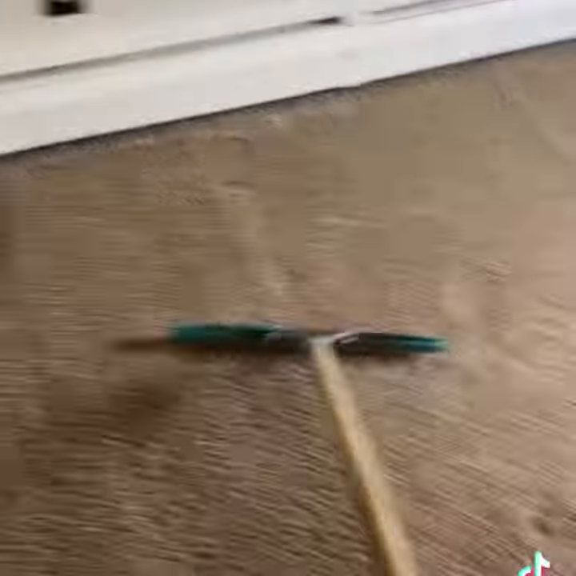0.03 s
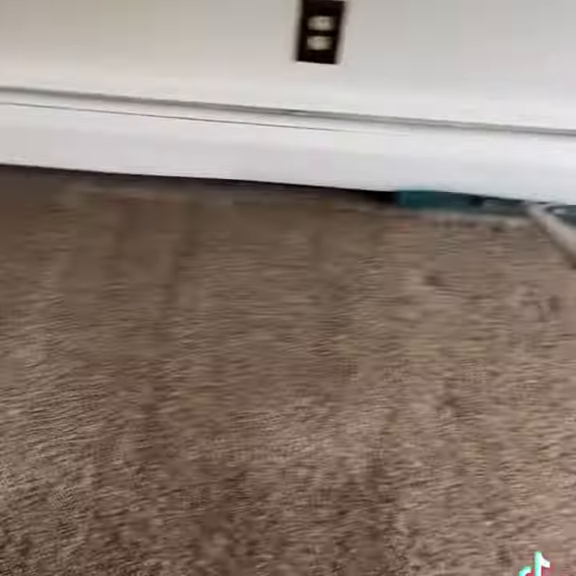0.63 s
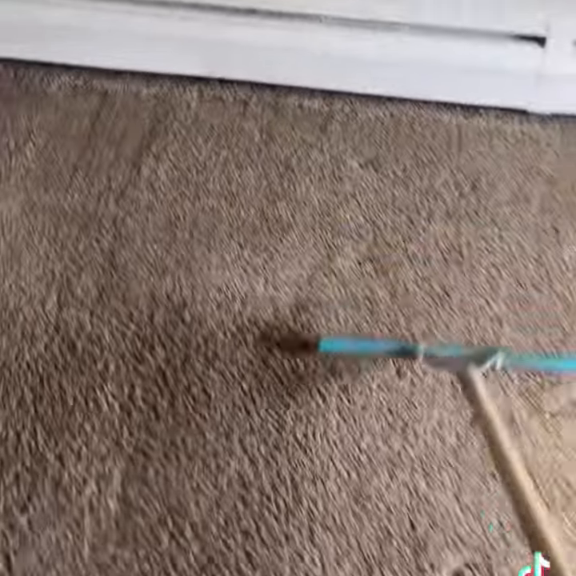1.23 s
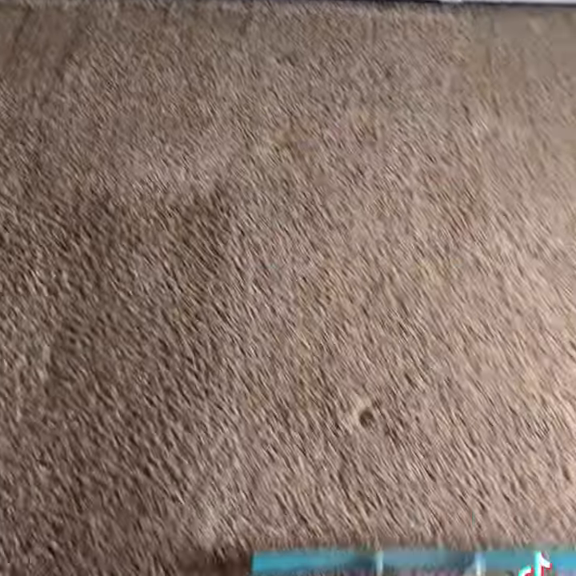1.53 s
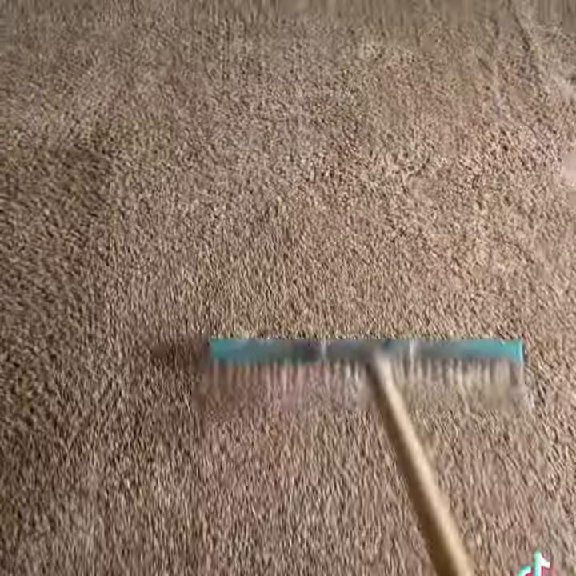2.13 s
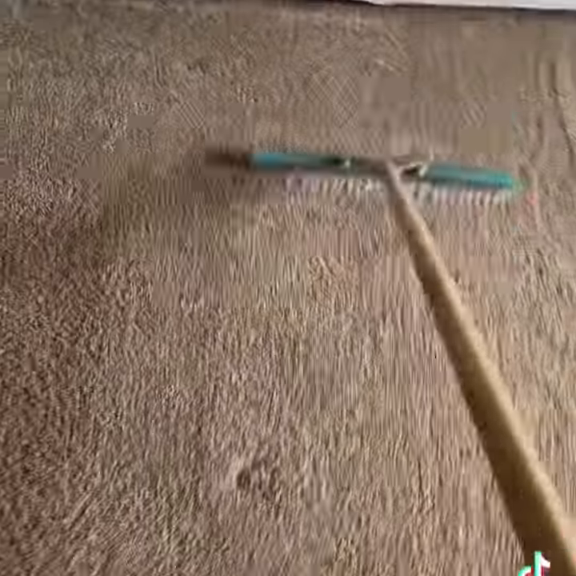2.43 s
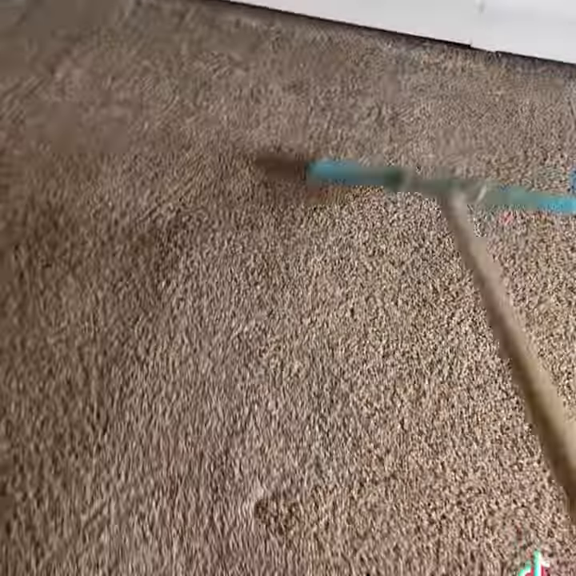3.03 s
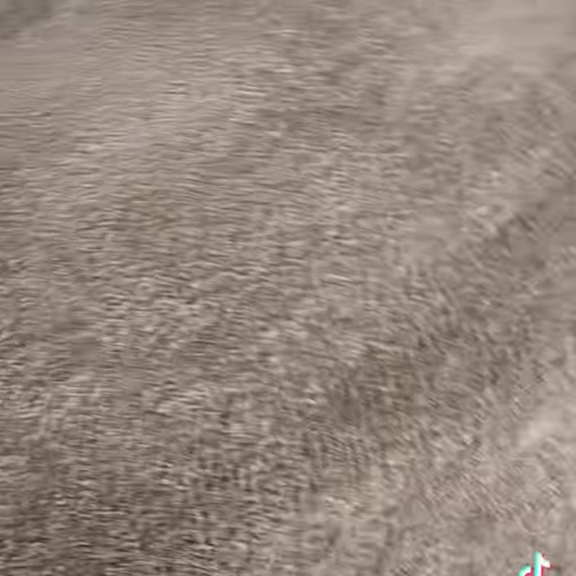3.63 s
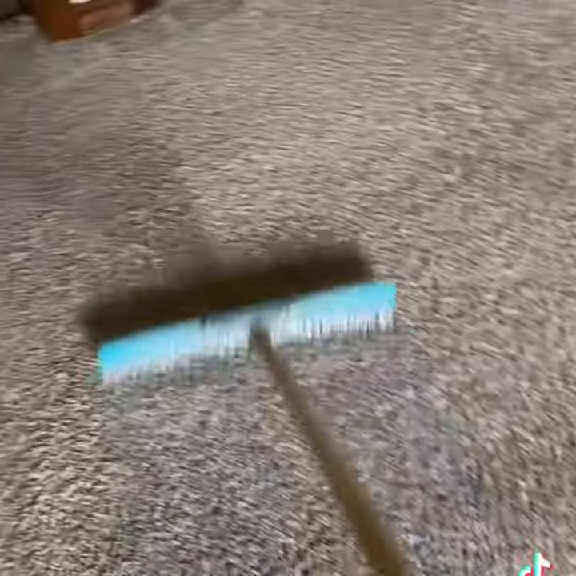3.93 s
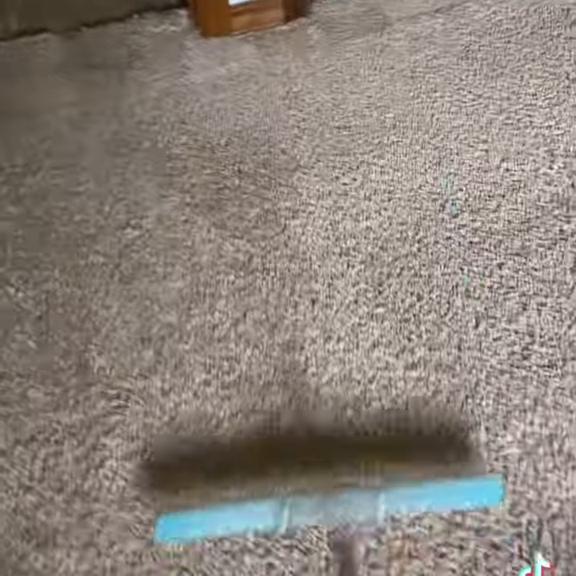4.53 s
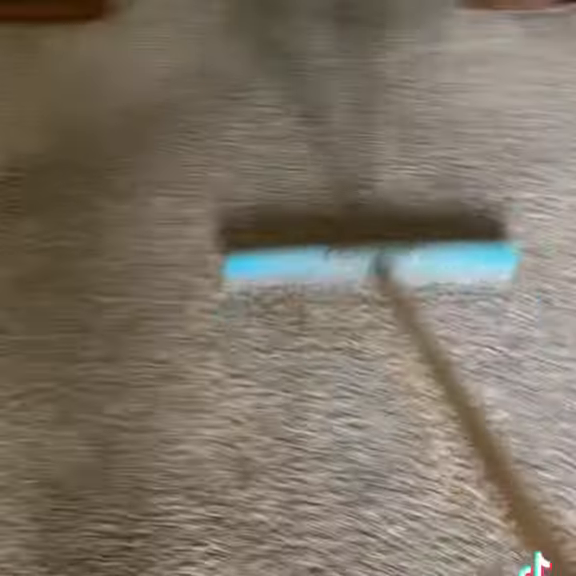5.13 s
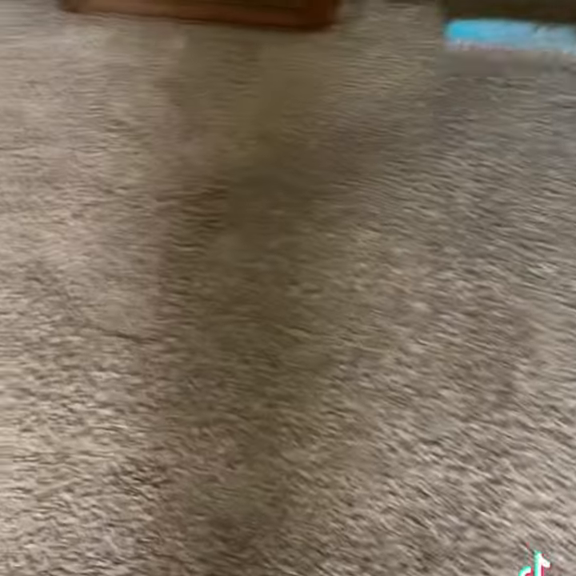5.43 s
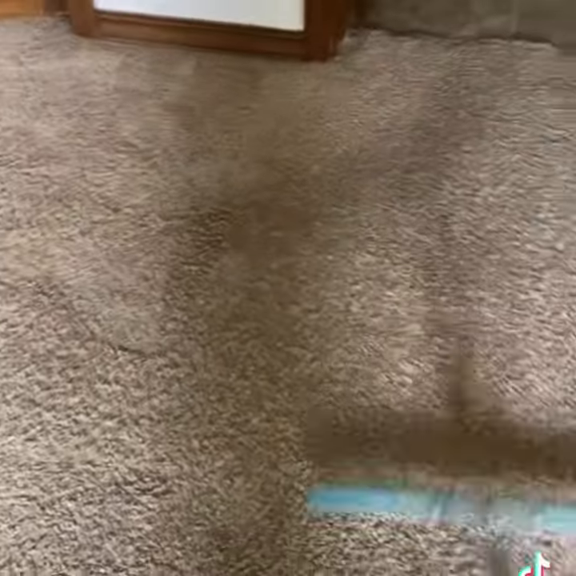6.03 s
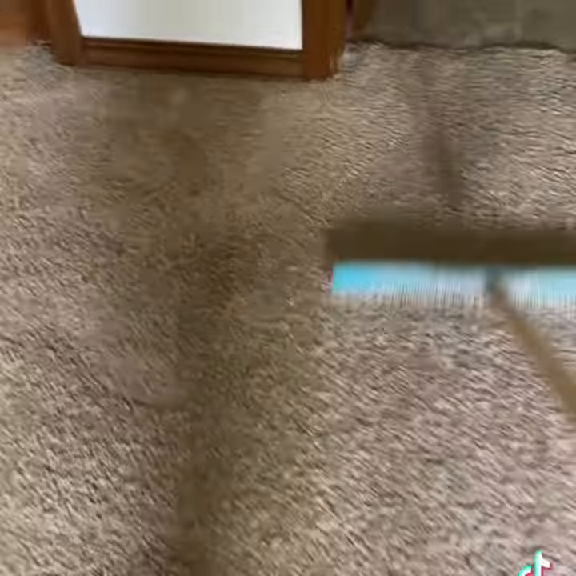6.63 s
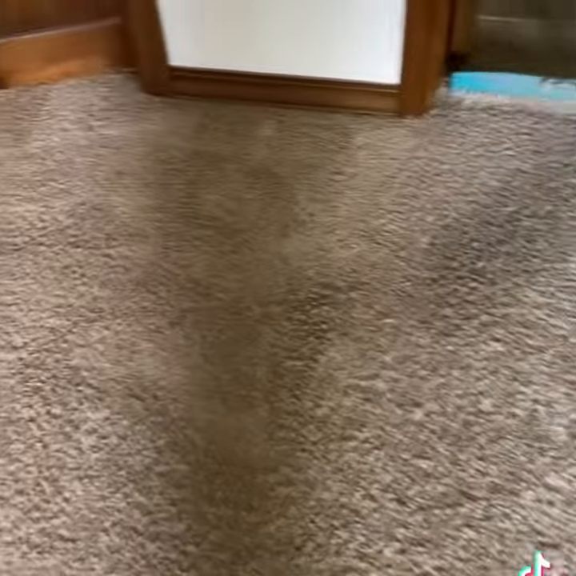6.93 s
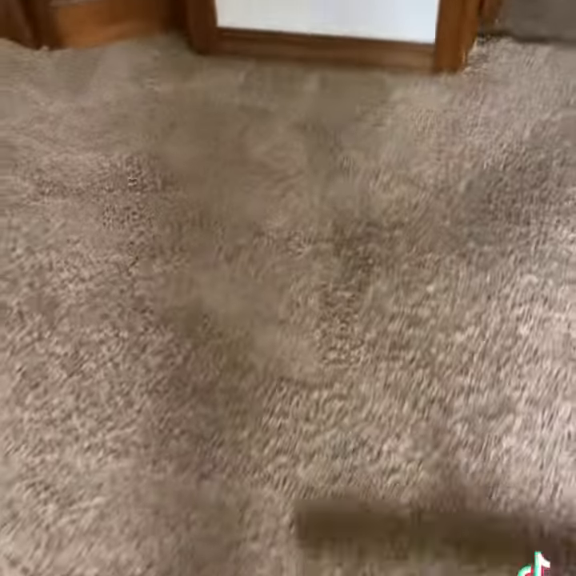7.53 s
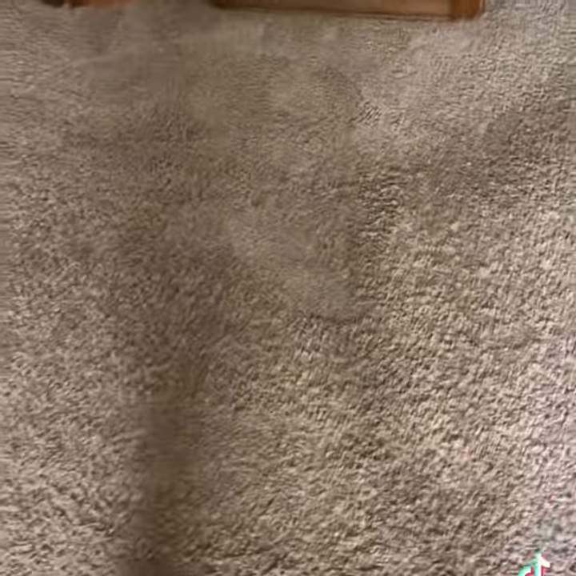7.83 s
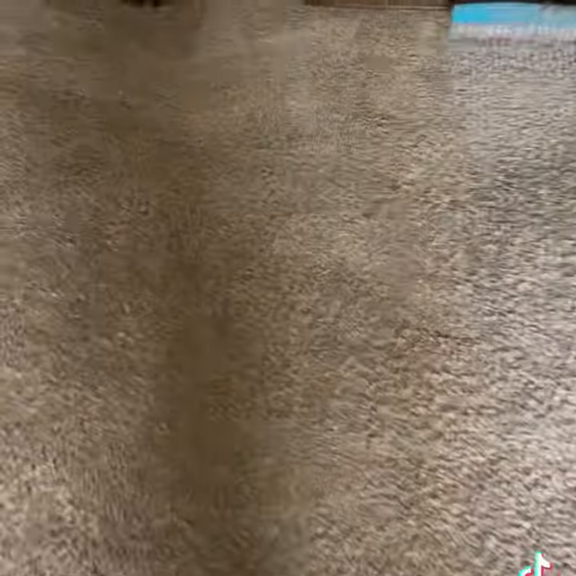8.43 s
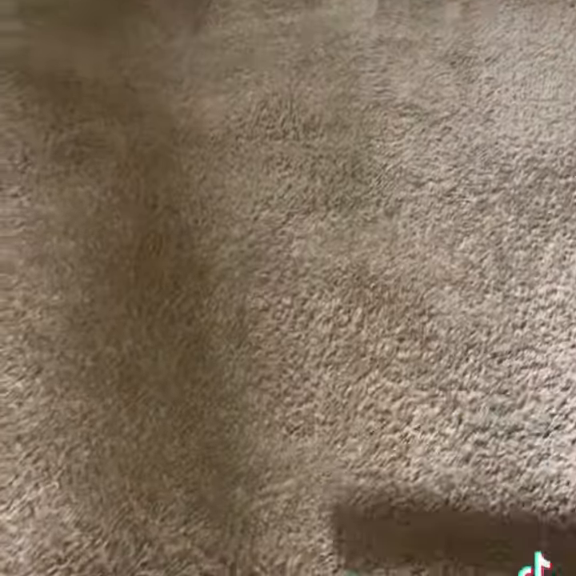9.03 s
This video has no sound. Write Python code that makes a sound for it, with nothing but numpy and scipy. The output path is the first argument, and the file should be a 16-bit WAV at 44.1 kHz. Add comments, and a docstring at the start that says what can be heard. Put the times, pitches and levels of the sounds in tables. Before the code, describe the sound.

A bristled rake works back and forth over carpet, close by, in a room with little echo. It opens with a light scrubbing push, and at 0.6 seconds the head strikes a metal heater cover with a crack and a short, dull boom. A soft hissing pull follows from 1 to 2 seconds, over a few muffled footfalls. Louder pushes start at about 1.9, 3.7, 4.9, 6.4, 7.8 and 9.1 seconds, each a coarse, rasping scrub lasting under a second. Between them come lighter pulls, a high hiss that flutters as the bristles skip. The loose plastic head clicks as strokes turn, with the sharpest clacks near 2.2, 3.7, 4.3, 4.9, 8 and 9.1 seconds. Single soft steps fall around 3.4 and 7.9 seconds. A faint, low appliance hum continues underneath throughout.

```python
"""In a carpeted room, a rake with a wooden handle is pushed and pulled over the pile close by.
Bristles stick and slip: pushes dig in and scrub, pulls hiss and skip. As the stroke turns, the loose
plastic head clacks on the handle, and once it strikes a baseboard heater, whose metal cover booms.
Soft footfalls and the hum of an appliance lie underneath."""
import sys
import numpy as np
from scipy import signal
from scipy.fft import rfft, irfft, next_fast_len
from scipy.io import wavfile
from scipy.ndimage import uniform_filter1d, map_coordinates

SR = 44100
rng = np.random.default_rng(int(sys.argv[2]) if len(sys.argv) > 2 else 0)


def pcm_store(signal):
    """Save signal as 16-bit PCM."""
    levels = np.round(np.clip(np.atleast_2d(signal), -1, 1) * 32767)
    wavfile.write(sys.argv[1], SR, levels.astype(np.int16).T)


N = 410130


def brushing(singing_db=-1.5, slow_clumps=0.5):
    """Stick-slip friction: bristles catch and spring free, more on a hard stroke; tufts let go in clumps."""
    # friction spectra: frequency_hz, level_db
    scrub_spectrum = [(60, -67), (150, -3), (260, -4), (450, -2.5), (580, -11), (720, 0.5), (860, -7),
                      (1000, -2), (1400, -12.5), (2200, -63), (5000, -66)]  # the pressed head
    rasp_spectrum = [(500, -32), (1200, 3), (1900, 0), (2350, 2), (2750, 2.5), (3400, -5), (4500, -7),
                     (7000, -36), (16000, -52)]  # catching bristles
    hiss_spectrum = [(1500, -25), (3300, -6.5), (4500, -1.5), (5200, 4), (5800, 1), (6400, -2),
                     (7500, -1.5), (8600, .5), (10200, -3), (11700, .5), (12800, -2.5), (14200, -4),
                     (15700, -9)]  # tips sliding on the push
    trail_spectrum = [(1500, -25), (2200, -13), (2800, -3), (3400, -4), (4300, 1), (4800, 1), (5200, 3),
                      (5650, 1), (6500, -.5), (7400, 0), (8800, 3.5), (10600, -2), (12400, 2), (15000, -6)]  # tips trailing on the pull
    # modes: pitch_hz, width_hz, level_db
    handle_modes = [(346, 32, -0.5), (433, 31.5, 6.5), (552, 96, 6.5), (666, 85, 7.5), (747, 133, 4),
                    (955, 130, -3.5), (1323, 32, -4)]  # bending of the handle and the head's bar
    bristle_modes = [(1660, 91, -1), (2140, 270, -2.5), (2504, 62, 3), (2675, 270, -4.5), (3120, 330, -10),
                     (3900, 410, -17)]
    tine_modes = [(2310, 120, -3.5), (2870, 33, -3), (5010, 100, 4), (4950, 260, 7), (5190, 220, 2.5),
                  (8750, 960, -9)]
    # what each motion gives: scrub_db, rasp_db, hiss_db
    push_mix = (-4, -2.5, 1.2)
    pull_mix = (-7, -12, 2.5)
    rest_mix = (-60, -59.5, -59.5)  # the bristles stir even as the stroke turns

    t = np.arange(N) / SR
    push, push_weight = pushing(t)
    pull, pull_weight, progress = pulling(t)
    drives = [(push_weight, pull_weight), (push, pull), (push, pull)]  # scrub, rasp, hiss
    scrub_db, rasp_db, hiss_db = [
        20 * np.log10(forth * amp(push_db) + back * amp(pull_db) + amp(rest_db))
        for (forth, back), push_db, pull_db, rest_db in zip(drives, push_mix, pull_mix, rest_mix)]
    effort = amp(np.clip(hiss_db + 36.5, -20, 10) * .6)  # scales every release rate
    dig = push / (push + pull + amp(-55))  # near 1 on the push, 0 on the pull
    clumps = wobble(70) + slow_clumps * wobble(22)

    def ringing(modes, base_rate):
        return unit(filtered(flicks(base_rate * effort, spread_db=2.5), lambda f: modal_sum(f, modes)))

    hollow = floorboards(flicks(2000 * effort, spread_db=4.0))
    scrub = amp(-0.5) * coloured(flicks(3500 * effort, spread_db=3.5), scrub_spectrum)
    scrub += ringing(handle_modes, base_rate=1500) + hollow
    rasp = amp(-0.53) * coloured(flicks(2600 * effort, spread_db=0.0), rasp_spectrum)
    rasp += amp(-7.5) * ringing(bristle_modes, base_rate=1500)
    tips = flicks(14000 * effort, spread_db=-1.5)
    hiss = dig * coloured(tips, hiss_spectrum) + (1 - dig) * coloured(tips, trail_spectrum)
    plucks = amp(-15.5) * ringing(tine_modes, base_rate=300)  # snagging tines
    # trailing tines sing more as the pull brings them closer
    singing = amp(singing_db) * pull * progress ** 2 * ringing([(5360, 200, 0)], base_rate=4100)
    return (singing
            + amp(scrub_db + 0.7 * clumps) * scrub
            + amp(rasp_db + 1.05 * clumps) * rasp
            + amp(hiss_db + 0.9 * clumps) * (hiss + plucks))


def flicks(rate, spread_db):
    """Shot noise: two streams of random bristle releases, rate a second, with log-normal sizes."""
    fired = rng.random((2, N)) < rate / SR
    size = amp(spread_db * rng.standard_normal((2, N)))
    polarity = np.sign(rng.standard_normal((2, N)))
    return unit(fired * size * polarity / np.sqrt(rate))


def pushing(t, attack_s=0.23, dig_lag_s=0.0029, dig_attack_s=0.21):
    """Driving force and load of the pushes: bristles buckle and rebound, and leaning adds weight."""
    # start_s, end_s, release_s, level_db, fade_db_per_s, bite_s, lean_db, heaviest_s
    pushes = [(-0.2, 0.79, 0.32, -41, -3.2, -0.13, 0.5, 0.22),
              (1.92, 2.91, 0.23, -33.4, 6.0, 2.03, 0.4, 2.62),
              (3.65, 4.32, 0.18, -35.2, 2.4, 3.76, 1.1, 4.0),
              (4.87, 5.73, 0.37, -32.3, 11.1, 4.98, 1.9, 5.16),
              (6.37, 7.18, 0.31, -32.9, 10.8, 6.48, 1.6, 6.72),
              (7.845, 8.62, 0.2, -32.5, 13.1, 7.965, 1.7, 8.08),
              (9.05, 9.85, 0.3, -33.6, 4.4, 9.17, 0.2, 9.3)]
    bite_db, bite_hz, bite_width_s = 3.2, 11, 0.085
    swell_db, swell_width_s = 2.2, 0.14
    strength, weight = np.zeros((2, N))
    for start, end, release, db, fade, bite, lean_db, heaviest in pushes:
        on = (t > start) & (t < end)
        since_bite = t[on] - bite
        rebound = np.cos(2 * np.pi * bite_hz * since_bite) * np.exp(-(since_bite / bite_width_s) ** 2)
        force = amp(db - fade * (t[on] - start) + bite_db * rebound)
        strength[on] += force * stroke(t[on], start, end, attack_s, release)
        swell = swell_db * np.exp(-((t[on] - heaviest) / swell_width_s) ** 2)
        digging = stroke(t[on], start + dig_lag_s, end, dig_attack_s, release)
        weight[on] += force * amp(lean_db + swell) * digging
    return strength, weight


def pulling(t, release_s=0.16, skip_share=0.6):
    """Amplitude modulation: the force and load of a pull swell each time the skipping head lands."""
    # start_s, end_s, attack_s, level_db, landing_s, skip_hz, skip_db, lean_db
    pulls = [(0.95, 1.95, 0.25, -47.3, 1.2, 7.7, 2.8, 2.5), (2.98, 3.71, 0.32, -44.5, 3.19, 7.1, 4.2, 0.5),
             (4.24, 4.88, 0.45, -42.6, 4.59, 8.1, 1.1, -2),
             (5.68, 6.375, 0.33, -45.0, 5.99, 9.3, 1.3, -0.5),
             (7.2, 7.87, 0.31, -43.3, 7.44, 8.6, 2.4, -1.5), (8.725, 9.11, 0.08, -42.8, 8.81, 9.2, 4.5, -2)]
    strength, weight, progress = np.zeros((3, N))
    for start, end, attack, db, landing, skip_hz, skip_db, lean_db in pulls:
        on = (t > start) & (t < end)
        skip = skip_db * np.cos(2 * np.pi * skip_hz * (t[on] - landing))
        glide = amp(db) * stroke(t[on], start, end, attack, release_s)
        strength[on] += glide * amp(skip)
        weight[on] += glide * amp(lean_db + skip_share * skip)
        progress[on] = (t[on] - start) / (end - start)
    return strength, weight, progress


def floorboards(tugs, reach_s=0.7):
    """Forced vibration: tugs on the pile ring each spot of the floor at its own pitch."""
    # spots under the rake: time_s, pitch_hz, width_hz, level_db
    spots = [(0.3, 248, 119, -1.5), (2.4, 227, 110, -5.5), (4.0, 506, 160, -9.5), (5.2, 400, 171, -3),
             (6.7, 567, 160, -8), (8.15, 487, 129, -4), (9.3, 487, 200, -7)]
    out, t = np.zeros((2, N)), np.arange(N) / SR
    for s, hz, width, db in spots:
        near = np.abs(t - s) < reach_s
        ring = unit(filtered(tugs[:, near], lambda f: steep_resonance(f, hz, width)))
        out[:, near] += amp(db) * ring * stroke(t[near], s - reach_s, s + reach_s, reach_s / 2, reach_s / 2)
    return out


def drifting(x, patchy_db):
    """Time-varying filtering: narrow peaks and dips come and go as the rake travels."""
    spectra = signal.stft(x, nperseg=1024)[2]
    patches = uniform_filter1d(rng.standard_normal(spectra.shape[1:]), size=3, axis=0)
    patches = uniform_filter1d(patches, size=16, axis=1)
    gain = unit(amp(patchy_db * unit(patches)))
    return signal.istft(spectra * gain, nperseg=1024)[1][:, :N]


def clacks(skew=0.2, crack_hz=13400, crack_width_hz=3500, afterring_db=-12.5, afterring_t60_s=0.22):
    """Impulse excitation: each slip of the head in its socket cracks and leaves the plastic ringing."""
    # time_s, level_db, half_length_s, ring_hz, width_hz, shell_db, crack_db
    slips = [(0.77, -41.5, 0.0027, 1800, 1200, -12, -16), (0.775, -38.5, 0.00063, 5000, 1500, 5, 9),
             (1.9452, -37, 0.00065, 4800, 1500, 8, 0), (1.966, -38, 0.0034, 2100, 700, -5, -7),
             (2.2033, -23, 0.00086, 2620, 500, -5, -9), (2.2162, -20, 0.00084, 2520, 400, 3, -16),
             (2.22, -16, 0.00049, 2720, 400, 6, -7), (2.2223, -18, 0.0014, 2740, 500, -2, -13),
             (2.226, -11, 0.00068, 5200, 500, -1, -3), (2.2277, -21, 0.00038, 5000, 500, 10, -12),
             (2.232, -10, 0.0004, 5030, 600, 15, -14), (2.689, -30.5, 0.0016, 2160, 700, -21, -20),
             (2.9038, -32.5, 0.0009, 2330, 1500, -8, -8), (2.924, -40.5, 0.006, 1730, 250, -6, -13),
             (3.318, -33, .001, 2200, 1100, -21, -17), (3.601, -37, 0.0055, 1890, 2000, -16, -15),
             (3.678, -31, 0.0016, 2780, 500, -20, -25), (3.6812, -27, 0.00076, 2750, 500, -24, -25),
             (3.6913, -15, 0.00048, 2800, 400, -6, -8), (4.312, -24, 0.00037, 2500, 900, 4, -13),
             (4.895, -34, 0.0013, 2400, 1200, 2, -6), (4.8985, -19, 0.0015, 2220, 1200, -5, -5),
             (4.9107, -14.5, 0.00078, 2690, 500, 6, 2), (5.6955, -44, 0.0013, 4480, 2000, -9, -10),
             (5.702, -46, 0.0044, 2190, 700, -8, -18), (6.3845, -33.5, .0005, 5000, 1500, -2, -2),
             (6.3895, -29.5, 0.0015, 2090, 800, -24, -22), (7.146, -40, .0008, 2800, 1000, -10, -7),
             (7.8785, -32, 0.00059, 3000, 2000, -5, -3), (7.8838, -35, 0.0029, 2300, 900, -21, -20),
             (8.0462, -19, 0.00066, 2840, 600, 6, -1), (8.616, -37.5, 0.0027, 1750, 700, 2, -15),
             (9.085, -36, .0015, 2300, 900, -2, -8), (9.09, -19, 0.00083, 2310, 900, -9, -1),
             (9.098, -31, 0.0025, 2350, 400, -2, -18), (9.102, -19, 0.00065, 4830, 900, 4, 12),
             (9.253, -38, 0.00029, 2480, 700, -8, -6)]
    # modes of the plastic head: pitch_hz, width_hz, level_db
    shell_modes = [(1750, 500, -11), (2720, 300, 0), (3650, 600, -11), (4450, 450, -3), (5120, 400, 3),
                   (6100, 600, -4), (7000, 500, -4), (9000, 2500, -5), (11500, 1500, -7)]
    lingering_modes = [(2240, 240, 12), (2760, 220, 6), (4340, 680, 12), (5230, 360, -10),
                       (12400, 4400, -19)]

    def unit_energy(x):
        return x / np.linalg.norm(x, axis=1, keepdims=True)

    def burst(envelope, response):
        return unit_energy(filtered(envelope * rng.standard_normal((2, len(envelope))), response))

    out, afterring = np.zeros((2, 2, N))
    t, t_after = np.arange(-SR // 100, SR // 50) / SR, np.arange(SR // 6) / SR
    decay = (1 - np.exp(-t_after / 0.0047)) * amp(-60 * t_after / afterring_t60_s)
    for s, db, slip_s, ring_hz, width_hz, shell_db, crack_db in slips:
        slip = np.exp(-(t / (slip_s * (1 + skew * np.sign(t)))) ** 2 / 2)  # starts faster than it ends
        ring = burst(slip, lambda f: resonance(f, ring_hz, width_hz) ** 2)
        shell = unit_energy(sum(amp(mode_db) * burst(slip, lambda f: steep_resonance(f, hz, width))
                                for hz, width, mode_db in shell_modes))
        crack = burst(slip, lambda f: resonance(f, crack_hz, crack_width_hz))
        size = amp(db) * np.linalg.norm(slip)
        add(out, s + t[0], size * unit_energy(ring + amp(shell_db) * shell + amp(crack_db) * crack))
        add(afterring, s, size * amp(afterring_db) * burst(decay, lambda f: modal_sum(f, lingering_modes)))
    return out, afterring


def settling(rise_s=0.013):
    """Overlapping impacts: tines dropping back on the pile after a push merge into a soft noise burst."""
    drops = [(0.762, -41.5), (2.91, -45), (4.314, -41.5), (5.701, -47), (7.142, -47.5), (8.615, -46)]  # time_s, level_db
    rattle_spectrum = [(150, -18), (500, 2), (1200, 4.5), (2300, 0.5), (3500, -2.5), (6000, -8),
                       (16000, -11)]  # frequency_hz, level_db
    out, t = np.zeros((2, N)), np.arange(SR // 8) / SR
    envelope = t / rise_s * np.exp(1 - t / rise_s)
    for s, db in drops:
        add(out, s, amp(db) * envelope * coloured(rng.standard_normal((2, len(t))), rattle_spectrum))
    return out


def heater_bumps(crack_t60_s=0.07, swell_s=0.0034, shudder_db=-6, shudder_t60_s=0.41, blur_hz=14):
    """Plate vibration: struck by the head, the heater's loose metal cover gives a dull, unsteady boom."""
    strikes = [(0.607, -26, -57), (0.61, -20, -28), (0.634, -27, -26), (0.77, -47, -46)]  # time_s, crack_db, boom_db
    cover_modes = [(186, -5, .4), (236, -8, .4), (272, -6.5, .36), (325, 0, .25), (357, -3, .23),
                   (396, -4.5, .2), (465, -5.5, .2), (607, -15, .22)]  # pitch_hz, level_db, t60_s
    # the contact, and the blur of the cover's many weaker modes: frequency_hz, level_db
    crack_spectrum = [(200, -9), (700, 4), (1250, 6.5), (1900, -1), (2600, 5.5), (4000, -2), (6000, -7),
                      (10000, -15), (16000, -27)]
    shudder_spectrum = [(100, -22), (180, -12), (400, 15), (600, -9), (2500, -31), (6000, -32),
                        (16000, -57)]
    out, t = np.zeros((2, N)), np.arange(SR * 3 // 4) / SR

    def noise():
        return rng.standard_normal((2, len(t)))

    def stray_phase():  # a random walk broadens each mode
        return 2 * np.pi * rng.random((2, 1)) + np.cumsum(noise(), axis=1) * np.sqrt(2 * np.pi * blur_hz / SR)

    for s, crack_db, boom_db in strikes:
        crack = coloured(noise(), crack_spectrum) * amp(-60 * t / crack_t60_s)
        boom = sum(amp(db - 60 * t / t60) * np.sin(2 * np.pi * hz * t + stray_phase())
                   for hz, db, t60 in cover_modes)
        shudder = coloured(noise(), shudder_spectrum) * amp(shudder_db - 60 * t / shudder_t60_s)
        add(out, s, amp(crack_db) * crack + amp(boom_db) * (boom + shudder) * (1 - np.exp(-t / swell_s)))
    return out


def footfalls(rise_s=0.018, settle_s=0.0102, rumble_db=-6):
    """Cushioned impact: a foot on carpet thuds, its pitch falls as the heel settles, the floor rumbles."""
    steps = [(1.003, -33, 80, 48), (1.064, -31, 60.5, 17), (1.456, -33, 60, 16), (1.521, -32, 63.3, 307),
             (1.588, -41, 45, 10), (1.979, -37, 50, 10), (3.429, -37, 54.5, 24), (7.901, -36, 65.5, 15)]  # time_s, level_db, pitch_hz, heel_excess_hz
    out, t = np.zeros((2, N)), np.arange(SR // 4) / SR
    load = t / rise_s * np.exp(1 - t / rise_s)
    for s, db, hz, heel_hz in steps:
        pitch_hz = hz + heel_hz * np.exp(-t / settle_s)
        thud = load * np.sin(2 * np.pi * np.cumsum(pitch_hz) / SR)
        rumble = filtered(load * rng.standard_normal((2, len(t))), lambda f: resonance(f, hz, hz * 0.5) ** 2)
        rumble /= np.abs(rumble).max(axis=1, keepdims=True)
        add(out, s, amp(db) * (thud + amp(rumble_db) * rumble))
    return out


def appliance(mains_hz=120):
    """Beating: a motor's wavering tones sound against the mains hum, over a low rumble."""
    motor_tones = [(64.35, 3.5, 0.12), (93.5, -2, 0.16), (126.7, -3.5, 0.43), (159.6, -3.5, 0.46),
                   (217.5, -11, 0.83)]  # pitch_hz, relative_db, waver_rad
    rumble_spectrum = [(15, -16), (35, -6), (60, -5), (90, 0), (200, -21), (1000, -84)]  # frequency_hz, level_db
    # slow changes of loudness: time_s, relative_db
    mains_levels = [(0.0, -41), (1.3, -44.5), (3.2, -43.5), (4.2, -46), (4.7, -45), (6.27, -48),
                    (6.68, -51), (7.07, -44), (7.85, -49.5), (8.73, -41), (9.3, -41)]
    motor_levels = [(0.0, -49.5), (1.01, -44), (1.97, -56), (2.51, -50.5), (7.51, -62.5), (9.3, -52)]
    t = np.arange(N) / SR
    mains_db = np.interp(t, *np.transpose(mains_levels))
    motor_db = np.interp(t, *np.transpose(motor_levels))

    def tone(hz, waver):
        phase = 2 * np.pi * hz * t + waver * wobble(4.3)
        return np.sqrt(2) * np.sin(phase) * amp(2.4 * waver * wobble(2.5))

    (low_hz, low_db, low_waver), *upper_tones = motor_tones
    # the lowest tone is a standing wave, so it changes most as the listener moves
    motor = amp(motor_db + low_db) * tone(low_hz, low_waver)
    motor += amp(-52.5) * sum(amp(db) * tone(hz, waver) for hz, db, waver in upper_tones)
    mains = amp(mains_db - 1.5) * tone(mains_hz, 0.78)
    rumble = amp(motor_db - 3.5) * coloured(rng.standard_normal(N), rumble_spectrum)
    return np.array([mains + motor + rumble, np.zeros(N)])


def room_noise(level_db=-47.0):
    """Ambient noise: a steady random floor, strongest in the bass."""
    air_spectrum = [(20, -28), (50, -5), (110, -3.5), (170, -6), (300, -10), (700, -29.5), (2000, -29),
                    (6000, -27), (16000, -35)]  # frequency_hz, level_db
    return amp(level_db) * coloured(rng.standard_normal((2, N)), air_spectrum)


def reverberation(x):
    """Diffuse reflections: the walls answer with an exponential decay, kept short by the carpet."""
    decay_times = [(150, 0.43), (1000, 0.39), (5000, 0.5), (14000, 0.02)]  # frequency_hz, t60_s
    hz, t, spectra = signal.stft(rng.standard_normal((2, SR // 2)), SR, nperseg=256)
    tail = signal.istft(spectra * amp(-60 * t / along(decay_times, hz)[:, None]), SR, nperseg=256)[1]
    response = np.pad(tail, ((0, 0), (SR // 200, 0))) / np.linalg.norm(tail[0])
    return signal.fftconvolve(x, response, axes=1)[:, :N]


def microphones(pair, max_coherence=1):
    """Partial coherence: stream one reaches both ports alike, stream two in antiphase."""
    coherence = [(130, .98), (300, .82), (600, .5), (1200, .35), (2500, .55), (4500, .5), (6100, .7),
                 (6800, 1), (8000, 1), (8500, .7), (12200, .8), (12800, 1), (14400, 1), (15500, .7)]  # frequency_hz, coherence_ratio
    # the housing shifts phase and level between the ports
    phase_lead = [(100, 0), (300, -.3), (700, -2.2), (1150, -2.1), (1550, -.3), (2900, 2), (5100, .3),
                  (5900, 1.1), (6800, 3.1), (8000, 3.18), (8500, 4.3), (10300, 6.3), (11600, 6.9),
                  (12300, 8), (12800, 9.38), (14400, 9.46), (15400, 12.4)]  # frequency_hz, left_lead_rad
    balance = [(60, -1.5), (200, -3), (400, -4.8), (700, -8), (1300, -4.5), (2300, -.5), (4400, 0)]  # frequency_hz, left_minus_right_db

    def split(hz):
        angle = np.arccos(np.clip(along(coherence, hz), 0, max_coherence)) / 2
        return np.array([np.cos(angle), np.sin(angle)])

    def housing(hz):
        left = amp(along(balance, hz) / 2) * np.exp(1j * along(phase_lead, hz) / 2)
        return np.array([left, 1 / left])

    mid, side = filtered(pair, split)
    return filtered(np.array([mid + side, mid - side]), housing)


def resonance(f, hz, width):
    """Damped oscillator: the causal response of one mode."""
    return 1j * f * width / (hz * hz - f * f + 1j * f * width)


def steep_resonance(f, hz, width):
    """Filters in cascade: a broad resonance steepens the skirts of a mode."""
    return resonance(f, hz, width) * resonance(f, hz, hz)


def modal_sum(f, modes):
    """Superposition of a body's modes, alternating in sign."""
    return sum((-1) ** k * amp(db) * resonance(f, hz, width) for k, (hz, width, db) in enumerate(modes))


def stroke(t, start, end, attack, release):
    """Raised-cosine envelope: a smooth rise, a glide and a smooth stop."""
    ease = lambda u: np.sin(np.pi / 2 * np.clip(u, 0, 1)) ** 2
    return ease((t - start) / attack) * ease((end - t) / release)


def wobble(rate):
    """A smooth random curve, rate knots a second."""
    return map_coordinates(rng.standard_normal(int(N * rate / SR) + 4), [np.arange(N) * rate / SR])


def filtered(x, response):
    """Linear filtering by a complex frequency response."""
    n = x.shape[-1]
    m = next_fast_len(n + 8192)
    return irfft(rfft(x, m) * response(np.fft.rfftfreq(m, 1 / SR)), m)[..., :n]


def coloured(x, spectrum):
    """Spectral shaping, scaled to rms 1."""
    return unit(filtered(x, lambda hz: amp(along(spectrum, hz))))


def along(points, hz):
    """Interpolation on a log frequency axis."""
    f, values = np.transpose(points)
    return np.interp(np.log(hz + 1), np.log(f + 1), values)


def amp(db):
    """Decibels to gain."""
    return 10 ** (np.asarray(db) / 20)


def unit(x):
    """Scale to rms 1."""
    return x / np.sqrt(np.mean(x ** 2) + 1e-20)


def add(track, s, sound):
    """Mix a sound into the track from time s."""
    start = round(s * SR)
    track[..., start:start + sound.shape[-1]] += sound[..., :N - start]


def scene():
    """Superposition of rake, feet and room; the clacks reach the ports less alike than the rest."""
    clack, afterring = clacks()
    settle, bump = settling(), heater_bumps()
    brush = drifting(brushing(), patchy_db=1.7)
    walls = reverberation(amp(-15) * (clack + settle) + amp(-8.5) * bump)
    rest = brush + afterring + settle + bump + walls + footfalls() + appliance() + room_noise()
    return microphones(clack, max_coherence=0.88) + microphones(rest)


def record(dry):
    """Band limiting: nothing passes above the cutoff."""
    cutoff_hz = 15900
    return filtered(dry, lambda hz: hz < cutoff_hz)


dry = scene()
out = record(dry)
pcm_store(out)
```